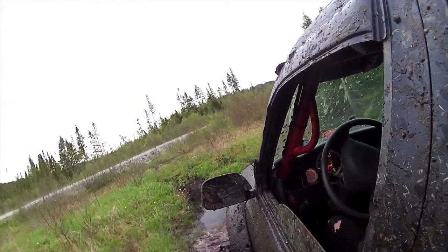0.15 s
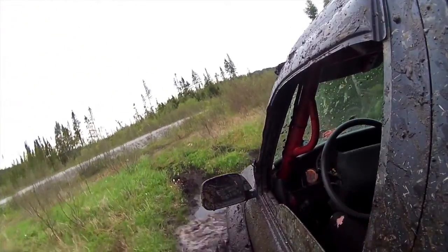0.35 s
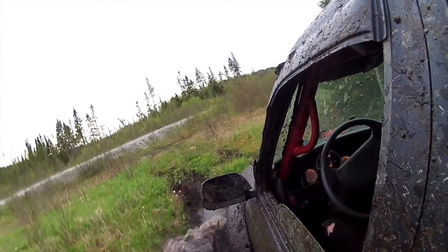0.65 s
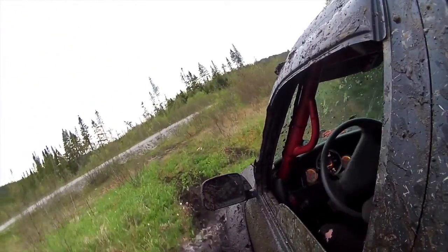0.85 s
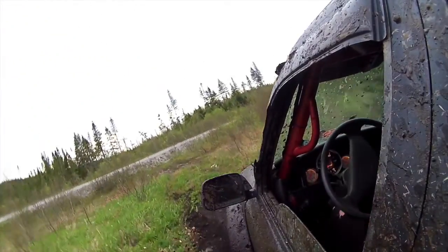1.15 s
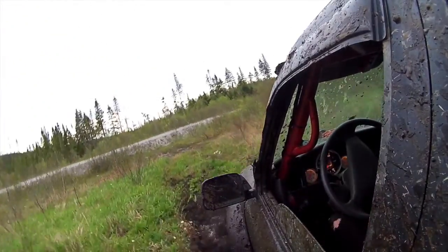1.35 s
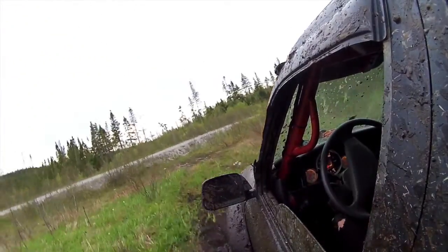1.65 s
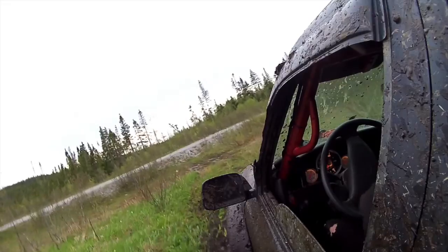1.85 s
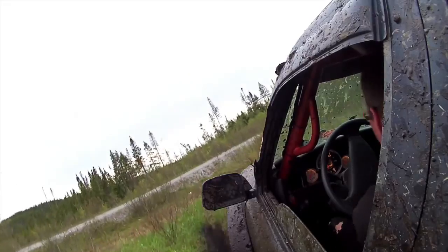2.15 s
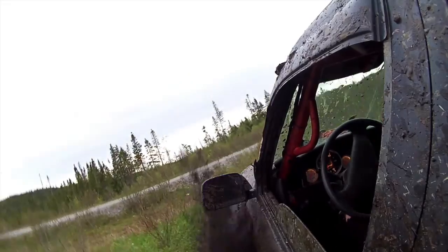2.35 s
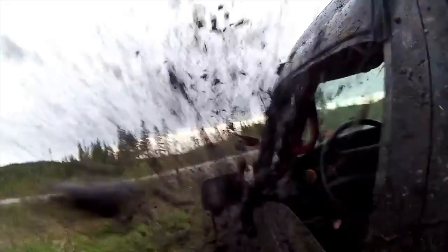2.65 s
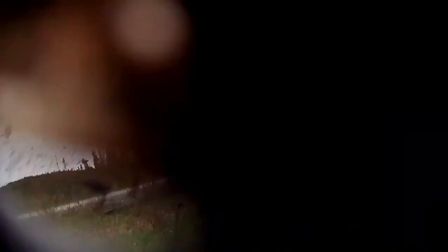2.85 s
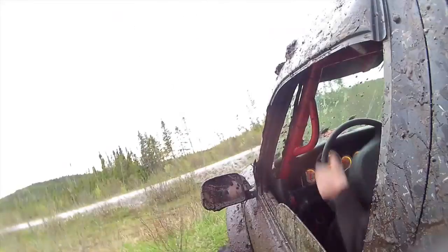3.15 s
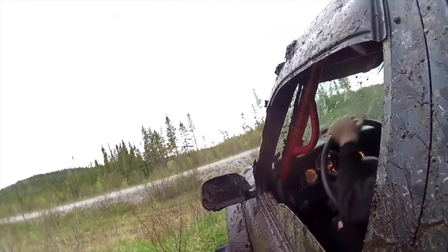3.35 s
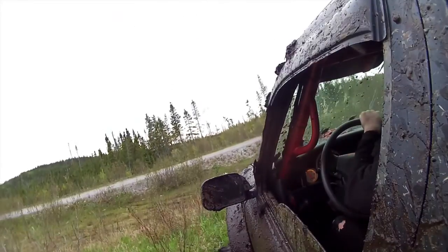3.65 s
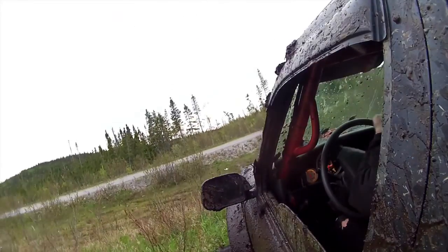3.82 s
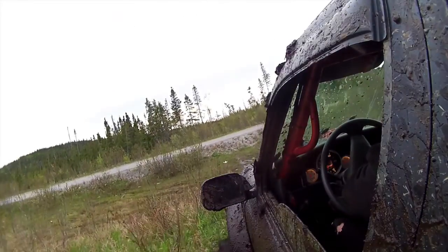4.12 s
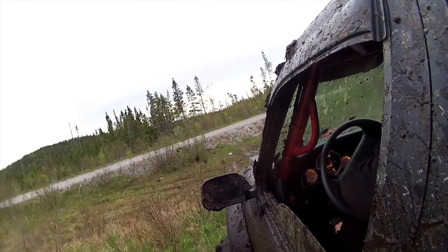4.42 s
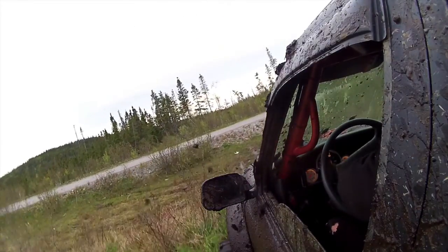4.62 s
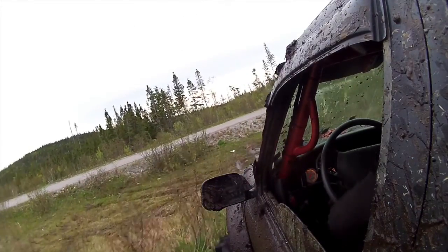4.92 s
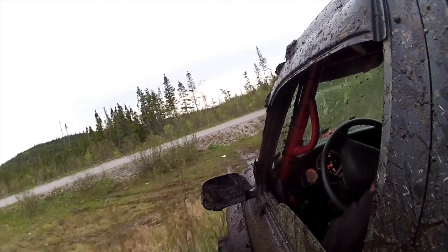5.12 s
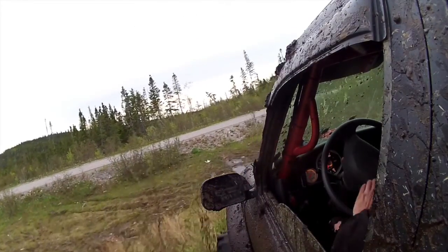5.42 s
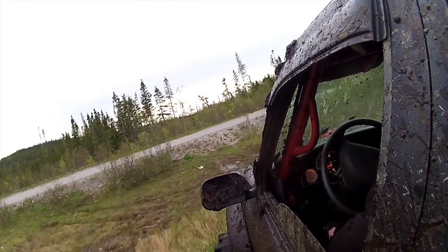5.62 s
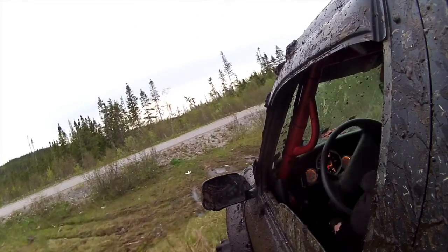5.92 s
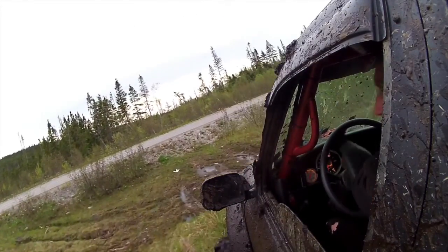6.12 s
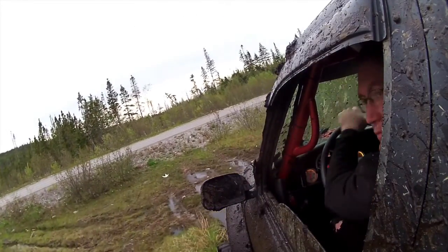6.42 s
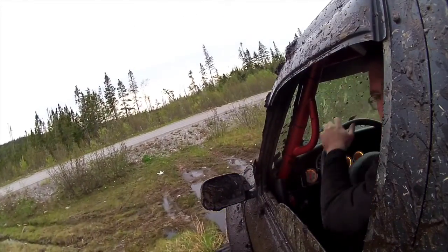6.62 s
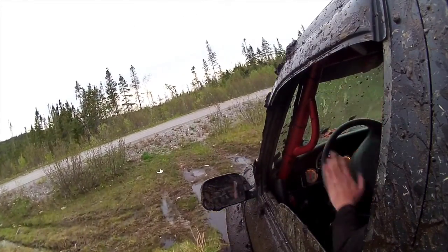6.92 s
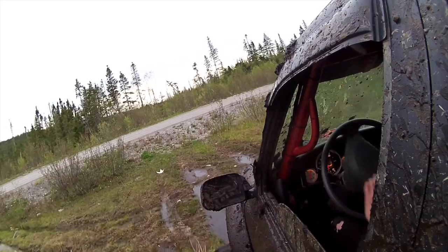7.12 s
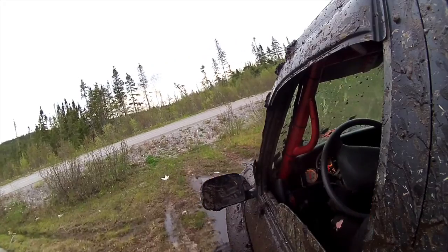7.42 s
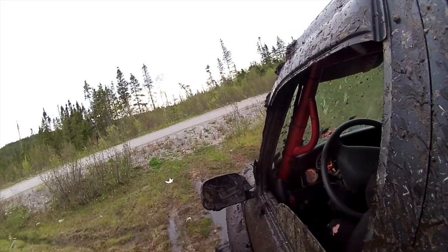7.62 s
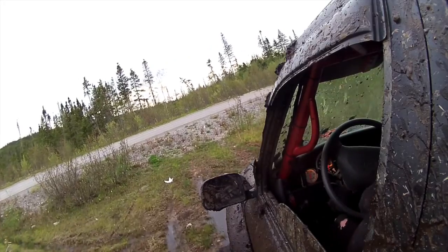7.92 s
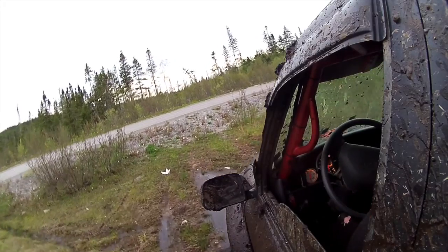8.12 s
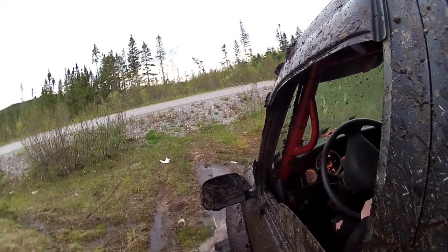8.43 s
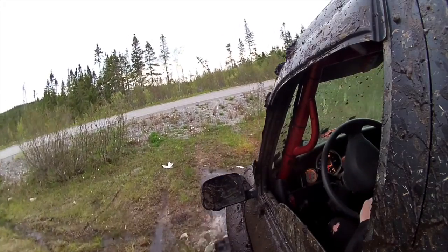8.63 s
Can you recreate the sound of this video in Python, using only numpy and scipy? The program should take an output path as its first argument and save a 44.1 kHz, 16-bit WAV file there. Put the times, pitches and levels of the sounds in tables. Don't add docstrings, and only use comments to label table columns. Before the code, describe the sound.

A truck's V8 is heard from a small hard-cased camera on its side, outdoors. From 0 to 2.5 seconds the throttle is stabbed repeatedly; pitch climbs and drops, uneven exhaust booms, panels rattle and intake and fan hiss surge, strongest near 2.2. Ruts add low rumble; a few faint drips tick on metal. From about 2.6 to 3.0 mud showers the case: dense wet splats, bright cracks, dull knocks and low thumps, ending around 3.04 in a violent overloaded slap. The engine ducks and muffles, then clears within a fraction of a second. Low revs climb again from 3.5, with two tiny rubber chirps near 3.6, to a roaring peak around 4.2. Shorter stabs come near 5 and 5.6 to 6, then 6.6. The hiss fades, leaving a low lumpy rumble, with small blips after 8 and faint ticks and squeaks around 8.6 to 8.7.

```python
import sys
import numpy as np
from scipy import signal
from scipy.fft import rfft, irfft, next_fast_len
from scipy.io import wavfile
from scipy.ndimage import uniform_filter1d

SR = 44100
rng = np.random.default_rng(int(sys.argv[2]) if len(sys.argv) > 2 else 0)


def to_linear_factor(level_db):
    exponent = np.asarray(level_db, float) / 20
    return 10 ** exponent


def put_to_file(sound):
    columns = np.atleast_2d(sound).T
    safe = np.clip(columns, -1, 1)
    whole_steps = np.round(safe * 32767)
    wavfile.write(sys.argv[1], SR, whole_steps.astype(np.int16))


N = 386757
TIME = np.arange(N) / SR

# climb start in seconds, length in seconds, firing rate from and to in Hz.
CLIMBS = [(0.0, 0.13, 119.6, 127), (0.172, .23, 130, 181), (0.559, 0.27, 157.2, 226),
          (1.1, 0.11, 164.3, 156), (1.5, 0.24, 123.4, 196), (1.94, 0.38, 158.2, 256),
          (2.5, 0.22, 182.2, 170), (3.1, 0.092, 107.1, 98), (3.529, 0.24, 63.03, 114),
          (3.841, 0.45, 119.9, 240), (4.9, 0.25, 120, 165), (6.2, 0.17, 105, 101), (6.451, 0.26, 104, 121),
          (7.0, .22, 108.7, 103), (7.419, .22, 106.9, 109), (8.0, 0.4, 99.84, 114.5),
          (8.6, 0.15, 114.8, 114)]
FLYWHEEL_S = 0.054
# down in seconds, deepest in seconds, gains of exhaust, intake and firing tone in dB.
STABS = [(0.161, 0.318, 5, 13.5, 5.5), (0.509, 0.744, 3.5, 17.5, 9), (1.178, 1.301, 1, 0.5, 5),
         (1.508, 1.674, 9, 12, 4), (1.879, 2.231, 5.5, 20.5, -3), (3.06, 3.419, -1.4, 0.1, 5.5),
         (3.58, 3.699, 3.5, 7.5, 5), (3.82, 3.933, 4.5, 14.5, 7.5), (3.873, 4.161, 8, 23, 7.5),
         (4.908, 5.062, 7.5, 8.5, 2.5), (5.099, 5.29, -3, -0.5, 4.5), (5.58, 6.12, 3, 1, 1),
         (6.508, 6.701, 5.5, 1, 3), (8.079, 8.203, -2, 1.5, 6.5), (8.376, 8.6, -3, -2.5, 6)]
BARK_S, FADE_S, LIFT_S = 0.094, 0.24, 0.17
# time in seconds, load in dB, churn of fan and wheels in dB.
CRUISE = [(0.0, -33, -50.5), (.5, -28, -50), (.95, -32, -51), (1.48, -36.5, -50.5), (1.9, -31.5, -52),
          (2.4, -29, -50.5), (3.03, -35.5, -48.5), (3.07, -42, -56.5), (3.55, -33.5, -56.5),
          (4.4, -28, -54.5), (4.88, -35, -57), (5.3, -27, -56.5), (5.55, -36, -60), (6.45, -38, -60),
          (6.95, -41, -64), (7.4, -40, -69.5), (8.0, -39.5, -70), (8.77, -40.5, -59)]
# time in seconds, rumble gain in dB, rattle gain in dB.
JOLTS = [(.45, 2, 1), (.95, 15, 2.5), (1.25, 8, 2), (1.85, 7, 3.5), (2.5, 18, 4), (3.1, 9.5, -2.5),
         (4.3, 16, -2), (4.65, 13, -3), (5.4, 3, 3.5), (5.8, 12, -1), (6.8, 7, 3), (8.3, 3, 6),
         (8.65, 4, 3.5)]
RUMBLE_DB, JOLT_S = -55.5, 0.33
LOPE_DB, LOPE_HZ = 1.5, 135

# frequency in Hz, level in dB.
PIPE_RESPONSE = [(20, -35.5), (60, -12.5), (110, -3), (160, 3), (230, -4.5), (330, 4.5), (430, -1),
                 (520, -11.5), (800, -59.5)]
# frequency in Hz, level in dB.
LINE_RESPONSE = [(20, -15), (100, 1.5), (160, 6), (192, 0.5), (228, 2.5), (275, 2), (335, 6), (400, 2.5),
                 (500, 3.5), (650, -2.5), (1000, -8.5)]
# multiple of cycle rate, level in dB throttle open, in dB shut.
CYCLE_LINES = [(3, -17, -13), (4, -7, -13.5), (5, -6, -13), (6, -10.5, -6), (7, -6.5, -2.5),
               (9, -4.5, -12.5), (10, -4, -1), (11, -5, -3.5), (12, -20.5, -10.5), (13, 0, -2),
               (14, -8, -2.5), (15, -10, 3), (16, 4, -5.5), (17, -19, 4.5), (18, -6.5, -2), (19, -12.5, -8),
               (20, -18.5, -5.5), (21, -7.5, 0.5), (22, -14, -3), (23, -2.5, -5), (24, -11, -7),
               (25, -18, -3), (26, -6.5, -6), (27, -0.5, -6.5), (30, -17, -16.5), (31, -10, -7),
               (34, -9.5, -8), (36, -19.5, -12), (37, -26, -7), (38, -17, -13)]
# firing rate in Hz, gain in dB.
FIRING_TONE_GAIN = [(65, -11), (92, -11), (107, -14.5), (132, -5.5), (157, -7.5), (178, -12), (200, -18),
                    (250, -19.5)]
# frequency in Hz, level in dB per Hz.
PANELS_OPEN = [(260, -26.5), (450, -5), (545, 1.5), (634, 3), (888, -4.5), (1090, -4.5), (1230, -15),
               (1500, -33.5), (1950, -46), (3300, -120)]
# frequency in Hz, level in dB per Hz.
PANELS_CLOSED = [(260, -24), (450, -1.5), (542, 0), (588, -5.5), (787, -13.5), (987, -18), (1080, -21),
                 (1500, -38), (1950, -64), (3300, -120)]
CLATTER_DB = -4
BY_LOAD, BY_AIR, BY_GULP, BY_JOLT = 0.23, 0.54, 0.43, 0.91
# frequency in Hz, level in dB per Hz.
AIR_OPEN = [(760, -20), (1300, 2.5), (1680, -5), (2710, 4), (3340, -7), (4070, -2.5), (4650, -7),
            (6350, -4.5), (7270, -12.5), (8150, -11), (11700, -28.5), (13000, -28), (15500, -39.5)]
# frequency in Hz, level in dB per Hz.
AIR_CLOSED = [(900, -23), (1300, -2), (1680, -2.5), (1950, 1.5), (2500, 3), (3050, 2), (3300, -5),
              (4150, -4), (4700, -8.5), (7350, -13), (8100, -16.5), (10900, -27), (15500, -36)]

# frequency in Hz, width in Hz, level in dB.
CASE_MODES = [(2140, 420, -10), (2880, 200, 1.5), (3900, 352, -19.5), (5600, 700, -20), (7400, 710, -24)]
# start in seconds, ring, crack and knock levels in dB, knock frequency in Hz.
MUD_HITS = [(2.6915, -18, -23, -20, 705), (2.6970, -4, -27, -10.5, 804), (2.7020, -8, -26.5, -2, 490),
            (2.7121, -3, -35.5, -14, 600), (2.7151, -3, -28.5, -22, 602.5),
            (2.7320, -24.5, -27.5, -19, 700), (2.7490, -12.5, -33, -16, 790),
            (2.7515, -17, -24.5, -21.5, 904), (2.7626, -3, -16, -24, 892), (2.7724, -29.5, -23, -19, 794),
            (2.7990, -15, -4.5, -12.5, 3900), (2.7995, -13, -30.5, -8, 624), (2.8098, -13, -19, -29, 1200),
            (2.8130, -44, -9, -26.5, 1000), (2.8340, -33.5, -19, -44, 900), (2.873, -9.5, -14.5, 1, 741),
            (2.8739, -24, -49.5, -7, 1076), (2.8990, -22, -50, -26, 914), (2.9680, -45, -28, -39, 909),
            (2.9908, -25, -25.5, -26, 1476), (3.0030, -21, -49, -7.5, 429), (3.0058, -37, -17.5, -33, 509),
            (3.0225, -58, -71, -37, 1920), (3.2460, -60, -43, -54, 920)]
SMEAR_S = 0.0023
# start in seconds, push in dB, frequency in Hz, rise and fall in seconds.
PORT_LUMPS = [
    (2.6960, -12, 165, .003, .08),
    (2.6990, -13, 270, .002, .05),
    (2.6980, -14, 46, .006, .12),
    (2.7520, -12, 130, .006, .03),
    (2.880, -20, 260, .004, .03),
    (2.9972, -1, 165, .009, .006),
    (3.0388, 26, 288, .0001, .0063),
    (3.0440, -10, 330, .0005, .009),
]
DIP_S, DIP_DB, RECOVER_S = 3.045, -13.5, 0.09
# start in seconds, level in dB, frequency in Hz.
BODY_DRIPS = [(1.2336, -34, 2383), (2.4246, -41, 2126), (2.46, -41, 1940), (2.6399, -33.5, 2050),
              (2.6274, -30, 3177), (4.783, -51, 2490), (6.8607, -54, 1940), (6.9852, -53, 3000),
              (7.6402, -62, 2027), (8.327, -54, 2748), (8.3903, -58, 2876), (8.574, -37, 651),
              (8.731, -39.5, 704)]
# start in seconds, length in seconds, level in dB, start and end in Hz.
RUBBER_SLIPS = [
    (3.585, .05, -45, 1040, 1060),
    (3.685, .05, -43, 1050, 1065),
    (8.66, .06, -60, 2500, 2880),
    (8.715, .054, -56, 2940, 2960),
]


def evened(x):
    return x / np.sqrt(np.mean(x ** 2) + 1e-20)


def levelled(x):
    power = uniform_filter1d(uniform_filter1d(x ** 2, size=8000), size=8000)
    return x / np.sqrt(power + 1e-20)


def curve(rows, count):
    rows = np.asarray(rows, float)
    return np.interp(TIME, rows[:, 0], rows[:, count])


def add(mix, s, sound):
    part = mix[round(s * SR):][:len(sound)]
    part += sound[:len(part)]


def resonate(x, hz, width_hz):
    turn = np.exp(2j * np.pi * np.cumsum(hz * np.ones(len(x))) / SR)
    r = np.exp(-np.pi * width_hz / SR)
    return 2 * (turn * signal.lfilter([1 - r], [1, -r], x / turn)).real


def coloured(x, points):
    hz, db = np.transpose(points)
    size = next_fast_len(N)
    bins_hz = np.fft.rfftfreq(size, 1 / SR)
    gain = to_linear_factor(np.interp(np.log(bins_hz + 1), np.log(hz), db))
    return irfft(rfft(x, size) * gain, size)[:N]


def drift(hz):
    return evened(signal.sosfilt(signal.butter(2, hz, fs=SR, output="sos"), rng.standard_normal(N)))


def swell(start_s, top_s, end_s, hold_s=0):
    ramp = np.interp(TIME, [start_s, top_s, top_s + hold_s + 1e-4, end_s], [0, 1, 1, 0])
    return np.sin(np.pi / 2 * ramp) ** 2


def drips():
    out, t = np.zeros(N), TIME[:1500]
    for s, db, hz in BODY_DRIPS:
        puff = rng.standard_normal(1500) * np.exp(-t / 0.0033)
        add(out, s, to_linear_factor(db + 16.0) * resonate(resonate(puff, hz, 390), hz, 900))
    return out


def squeaks():
    out = np.zeros(N)
    for s, length_s, db, from_hz, to_hz in RUBBER_SLIPS:
        hz = np.linspace(from_hz, to_hz, int(length_s * SR))
        tone = np.sin(2 * np.pi * np.cumsum(hz) / SR)
        scrape = evened(resonate(rng.standard_normal(len(hz)), hz, 0.06 * to_hz))
        add(out, s, to_linear_factor(db) * (tone + 0.6 * scrape) * signal.windows.tukey(len(hz), 0.6))
    return out


def mud():
    smears, out, t = np.zeros(N), np.zeros(N), TIME[:2000]
    smear_shape = (t / SMEAR_S) ** 0.11 * np.exp(-(t / SMEAR_S) ** 0.82)
    for s, ring_db, crack_db, knock_db, hz in MUD_HITS:
        noise = rng.standard_normal(2000)
        knock = np.sin(2 * np.pi * hz * t) + 0.41 * np.sin(3.3 * np.pi * hz * t)
        add(smears, s, to_linear_factor(ring_db) * noise * smear_shape)
        add(out, s, to_linear_factor(crack_db) * noise * np.exp(-t / 0.00076))
        add(out, s, to_linear_factor(knock_db) * knock * np.exp(-t / 0.0024))
    shower = np.interp(TIME, [2.58, 2.7, 2.95, 3.03], [0, 1, 0.6, 0])
    drop_db = 4.0 * np.minimum(rng.exponential(1, N), 4) - 34.5
    spray = to_linear_factor(drop_db) * (rng.random(N) < 1500 * shower / SR)
    struck = smears + 0.55 * spray
    rung = np.zeros(N)
    for hz, width_hz, db in CASE_MODES:
        rung += to_linear_factor(db) * resonate(resonate(struck, hz, 1.6 * width_hz), hz, 2.1 * width_hz)
    low_pass = signal.butter(3, 8500, fs=SR, output="sos")
    return signal.sosfilt(low_pass, out + 6.32 * rung + 0.3 * spray)


def thumps():
    push, t = np.zeros(N), TIME[:8000]
    for s, db, hz, rise_s, fall_s in PORT_LUMPS:
        fall_db = 60 * (np.maximum(t - rise_s, 0) / fall_s) ** 2
        shape = np.minimum(t / rise_s, 1) ** 2 * to_linear_factor(db - fall_db)
        add(push, s, shape * np.sin(2 * np.pi * hz * t + 0.4 * np.pi))
    stop = 1.1
    stopped = np.clip(push, -stop, stop)
    sagged = signal.lfilter(*signal.butter(1, 170, "high", fs=SR), stopped)
    pinned = np.minimum(6 * uniform_filter1d(1.0 * (abs(push) > stop), size=400), 1)
    return pinned * sagged + (1 - pinned) * stopped


def port_plug_db():
    return DIP_DB * (TIME > DIP_S) * np.exp(-np.maximum(TIME - DIP_S, 0) / RECOVER_S)


def revs():
    start_s, length_s, from_hz, to_hz = np.transpose(CLIMBS)
    corners_s = np.ravel([start_s, start_s + length_s], "F")
    rate_hz = np.interp(TIME, corners_s, np.ravel([from_hz, to_hz], "F"))
    for _ in range(2):
        rate_hz = uniform_filter1d(rate_hz, int(FLYWHEEL_S * SR), mode="nearest")
    return rate_hz


def pedal():
    bark = [swell(s, s + BARK_S, top + FADE_S, max(top - s - BARK_S, 0)) for s, top, *_ in STABS]
    gulp = [swell(s, top, top + LIFT_S) ** 0.74 for s, top, *_ in STABS]
    gains_db = np.array(STABS)
    return [np.max(gains_db[:, [k]] * shape, 0) for k, shape in ((2, bark), (3, gulp), (4, bark))]


def firings(rate_hz, scatter_db, jitter_s):
    at = np.flatnonzero(np.diff(np.floor(np.cumsum(rate_hz) / SR)))
    chance = rng.standard_normal((len(at), 2))
    place = np.clip(at + jitter_s * chance[:, 0] * SR, 0, N - 1).astype(int)
    return np.bincount(place, to_linear_factor(scatter_db * chance[:, 1]), N)


def rumble(turns, jolt_db):
    crank = np.sqrt(2) * np.sin(2 * np.pi * turns / 4)
    wind = evened(resonate(resonate(rng.standard_normal(N), 42, 40), 42, 40))
    return to_linear_factor(RUMBLE_DB) * (to_linear_factor(0.43 * jolt_db) * crank + to_linear_factor(jolt_db) * wind)


def hiss(hiss_db):
    air = rng.standard_normal(N) * to_linear_factor(1.6 * drift(150) + 0.7 * drift(14))
    bright = np.clip((hiss_db + 57.5) / 16, 0, 1)
    mixed = bright * evened(coloured(air, AIR_OPEN)) + (1 - bright) * evened(coloured(air, AIR_CLOSED))
    return to_linear_factor(hiss_db) * mixed


def clatter(rate_hz, opening):
    shake = levelled(firings(rate_hz, scatter_db=6.0, jitter_s=0.0008)) + 2.0 * rng.standard_normal(N)
    panels_open = levelled(coloured(shake, PANELS_OPEN))
    panels_closed = levelled(coloured(shake, PANELS_CLOSED))
    return opening * panels_open + (1 - opening) * panels_closed


def firing_tone(rate_hz, turns, level_db):
    tone_db = level_db + np.interp(rate_hz, *np.transpose(FIRING_TONE_GAIN))
    waver_db = 2.0 * drift(16) + 1.5 * drift(11)
    return np.sqrt(2) * to_linear_factor(tone_db + waver_db) * np.sin(2 * np.pi * turns)


def exhaust(rate_hz, opening):
    step = slice(None, None, 16)
    cycles, share, t = (np.cumsum(rate_hz) / SR / 8)[step], opening[step], TIME[step]
    cycles = cycles + 0.005 * share * drift(12)[step]
    lines = np.zeros(len(t))
    overrun_db = 12 * (1 - share) * np.clip((rate_hz[step] - 140) / 50, 0, 1)
    for k, open_db, shut_db in CYCLE_LINES:
        lag, beat = rng.standard_normal(2)
        waver_db = 2.6 * np.sin(2 * np.pi * (2.5 + beat) * t + 9 * lag) + overrun_db * (k < 4.5)
        line_db = share * open_db + (1 - share) * shut_db + waver_db
        lines += to_linear_factor(line_db) * np.cos(2 * np.pi * k * cycles + 1.7 * lag)
    lines = signal.resample_poly(lines, 16, 1)[:N]
    burn = levelled(firings(rate_hz, scatter_db=9.0, jitter_s=0.0012)) + 0.64 * rng.standard_normal(N)
    rough = (0.42 + 0.16 * opening) * levelled(coloured(burn, PIPE_RESPONSE))
    return levelled(levelled(coloured(lines, LINE_RESPONSE)) + rough)


def engine():
    rate_hz = revs()
    turns = np.cumsum(rate_hz) / SR
    bark_db, gulp_db, ring_db = pedal()
    load_db, churn_db = curve(CRUISE, count=1) + bark_db, curve(CRUISE, count=2)
    hiss_db = churn_db + gulp_db
    opening = np.clip((hiss_db + 58) / 14, 0, 1)
    lope = np.cos(2 * np.pi * (turns / 8 + 0.1 * drift(2)))
    lope_db = LOPE_DB * np.clip((LOPE_HZ - rate_hz) / 25, 0, 1) * (1 - opening) * lope
    jolt_db, rattle_db = sum(np.outer(db, swell(s - JOLT_S, s, s + JOLT_S)) for s, *db in JOLTS)

    panels_db = CLATTER_DB + BY_LOAD * load_db + BY_AIR * churn_db + BY_GULP * gulp_db
    panels_db = panels_db + BY_JOLT * rattle_db + 0.4 * lope_db + 1.5 * drift(14)
    panels = to_linear_factor(panels_db) * clatter(rate_hz, opening)
    bass = firing_tone(rate_hz, turns, load_db + ring_db) + rumble(turns, jolt_db)
    dip_db = port_plug_db()
    boom = to_linear_factor(load_db + lope_db + 0.65 * dip_db) * exhaust(rate_hz, opening)
    return to_linear_factor(0.3 * dip_db) * bass + boom + to_linear_factor(dip_db) * (panels + hiss(hiss_db))


def scene():
    return (drips() + squeaks() + mud() + thumps() + engine())[None]


def band_limit(x):
    return signal.sosfilt(signal.butter(12, 16620, fs=SR, output="sos"), x)


def record(dry):
    power_db = 10 * np.log10(abs(uniform_filter1d(dry[0] ** 2, size=200)) + 1e-12)
    fall_db = TIME * 42.0
    held_db = np.maximum.accumulate(power_db + fall_db) - fall_db
    over_db = np.maximum(held_db + 6.5, 0)
    late_db = signal.lfilter([0.004], [1, -0.996], over_db)
    muffled = signal.sosfiltfilt(signal.butter(10, 15000, fs=SR, output="sos"), dry)
    preamp = to_linear_factor(-78) * coloured(rng.standard_normal(N), [(100, -3.5), (14800, 2), (15400, -37)])
    mix = np.clip(muffled / to_linear_factor(0.5 * late_db) + preamp, -1, 1)
    return band_limit(mix)


dry = scene()
out = record(dry)
put_to_file(out)
```